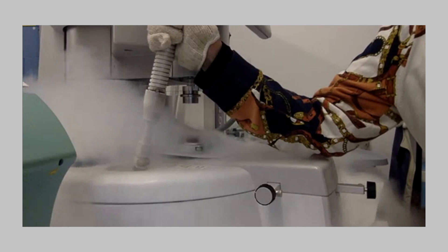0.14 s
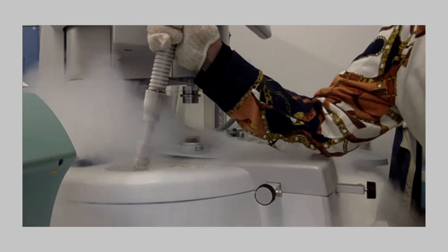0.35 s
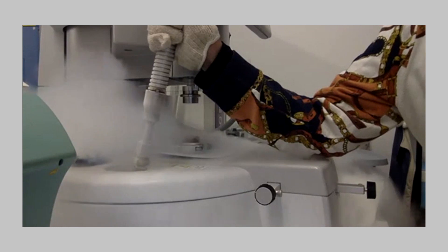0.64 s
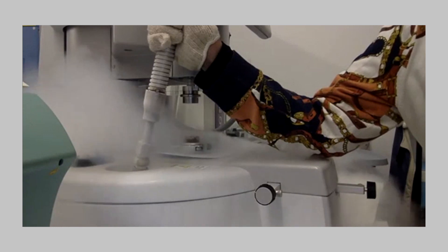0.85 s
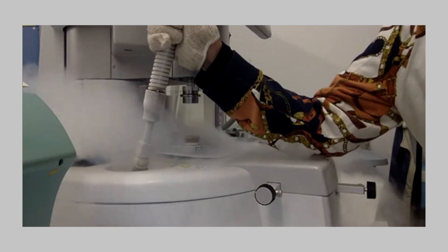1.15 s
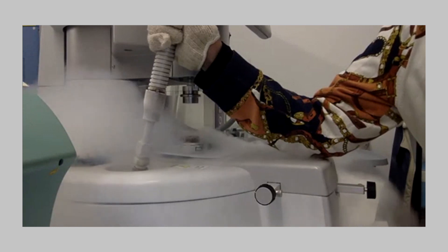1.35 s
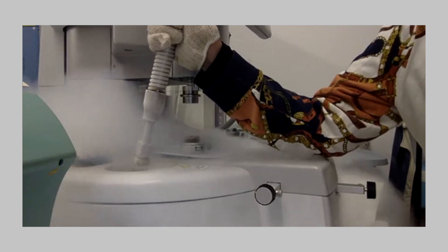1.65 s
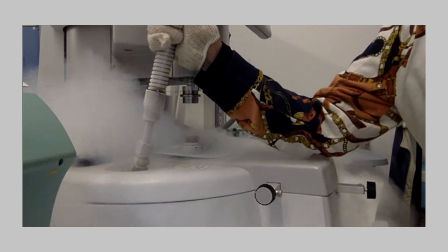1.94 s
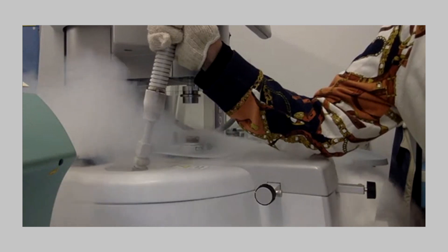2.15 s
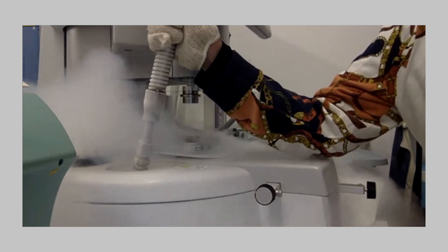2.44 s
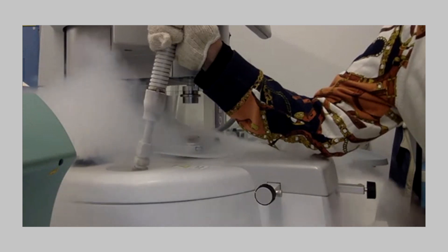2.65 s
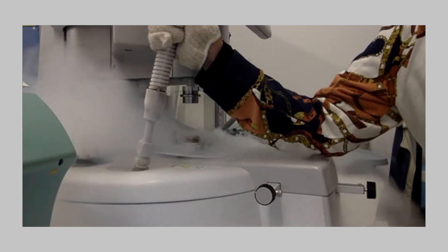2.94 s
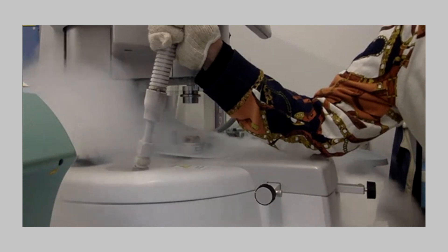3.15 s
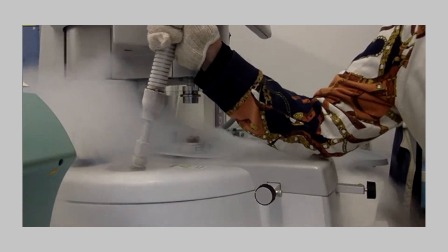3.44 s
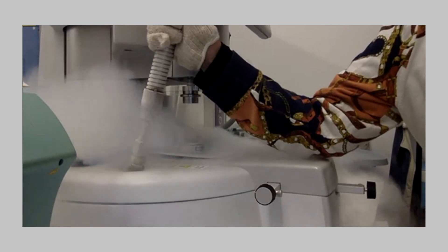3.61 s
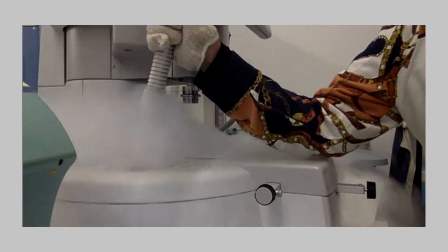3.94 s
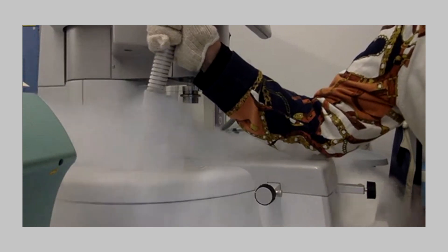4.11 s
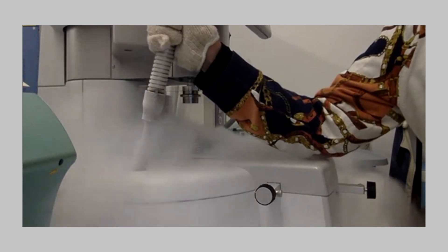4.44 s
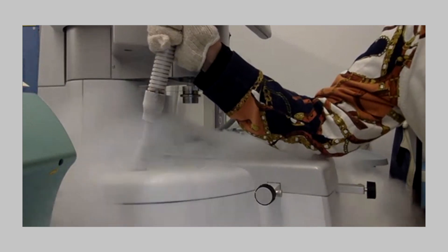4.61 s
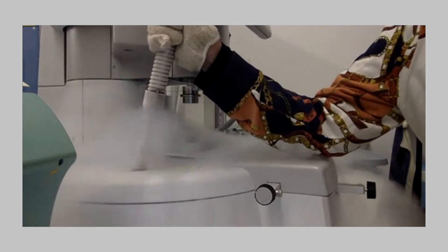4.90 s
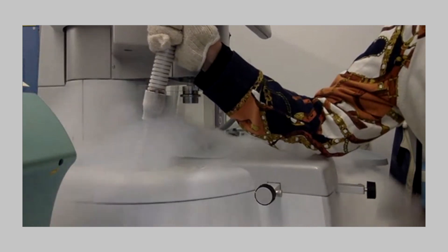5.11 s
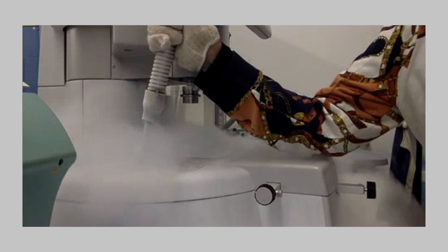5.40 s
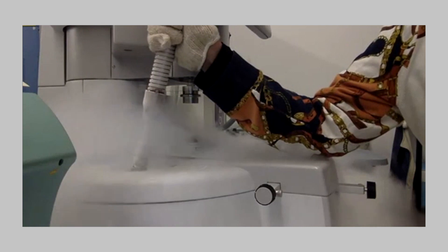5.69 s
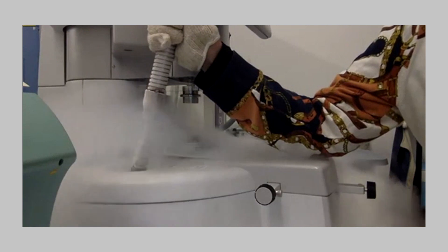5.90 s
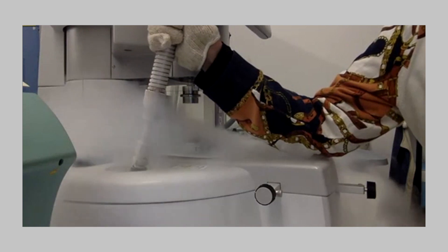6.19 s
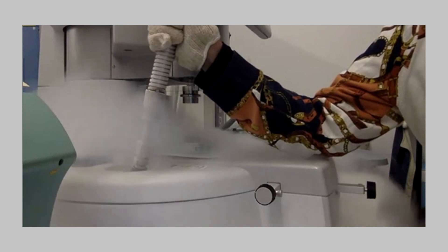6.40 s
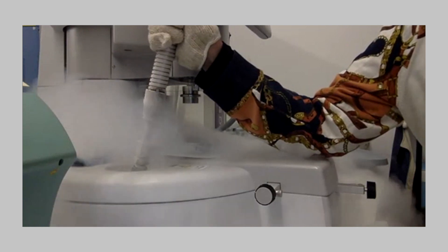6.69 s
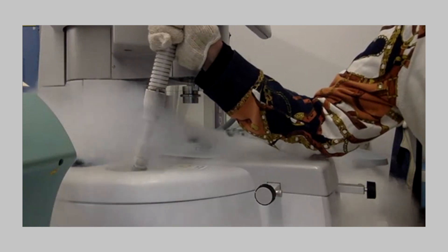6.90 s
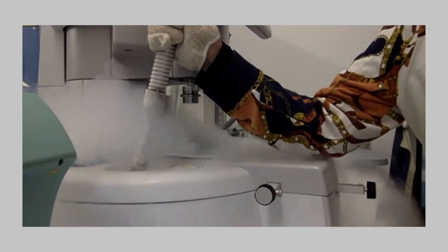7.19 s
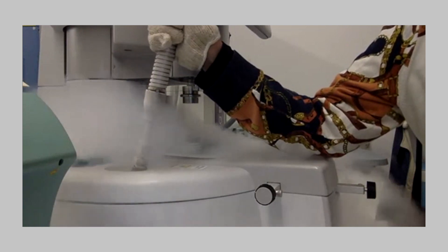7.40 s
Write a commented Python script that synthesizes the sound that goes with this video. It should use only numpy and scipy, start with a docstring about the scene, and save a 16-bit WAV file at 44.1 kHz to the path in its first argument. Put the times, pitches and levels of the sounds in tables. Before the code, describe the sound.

Close and mono, boiling liquid nitrogen sputters out of a nozzle with a bright, thin, fluttering hiss, crackling droplets and short chirpy rings. Airy high whistles swell now and then in the first half and again after five seconds. The busiest spitting comes past the middle, with quick dips in flow, before a softer ending. The tank's hollow bubbling is barely audible over faint room air, with hardly any echo.

```python
"""A ragged hiss full of tiny bursts comes first: liquid nitrogen sputters from a hose and boils off.
It rings a tank's narrow neck and the nozzle cavities, whose strengths shift as the hose moves.
Weakly, the tank's air column rings too. Now and then the flow chokes and snaps back.
Place: a ventilated lab. The jet and neck arrive direct, the fainter rest with a short room tail.
One microphone feeds both channels."""
import sys
import numpy as np
from scipy import signal
from scipy.fft import rfft, irfft, next_fast_len
from scipy.io import wavfile
from scipy.ndimage import uniform_filter1d, map_coordinates

SR = 44100
rng = np.random.default_rng(int(sys.argv[2]) if len(sys.argv) > 2 else 0)


def persist_wave(psi):
    """Save psi, clipped to +-1, as 16-bit WAV."""
    counts = np.round(np.clip(psi, -1, 1) * 32767).astype(np.int16)
    wavfile.write(sys.argv[1], SR, np.atleast_2d(counts).T)


def magnitude_from_level(level_db):
    """Linear magnitude for a level in decibels (20 dB per decade)."""
    exponent = np.asarray(level_db, float) / 20
    return 10 ** exponent


N = 332955

# ventilation of the lab, spectral shape: pitch_hz, relative_db
VENTILATION_SHAPE = [(13, -46), (22, -17.5), (32, -19), (80, -8), (258, 0.5), (324, -5), (450, -5),
                     (580, -24), (990, -120)]
# gas pockets bursting in the liquid: start_s, level_db (before the swell and fade), pitch_hz, swell_s
BUBBLES = [(4.4792, -56, 1266, 0.01), (7.0, -56, 1540, 0.0073)]
# boiling heard below the hiss, spectral shape: pitch_hz, relative_db
BOIL_SHAPE = [(200, -29.5), (400, -9), (1000, -7.5), (1800, -6), (2600, -3), (3200, -12.5), (4000, -41.5)]
# resonances of the tank's air column: pitch_hz, width_hz, level_db
TANK_MODES = [(647, 160, 0.5), (996, 72, 2), (1310, 140, -3.5)]
# the flow through the hose: time_s, hiss_level_db, boil_level_db, lowest_tank_mode_level_db
FLOW = [(0, -54, -75, -76.5), (.22, -46.5, -67, -76), (.5, -47, -64.5, -75), (.8, -48, -68, -74),
        (1.15, -48, -66.5, -74), (1.45, -50, -69.5, -77.5), (1.75, -48.5, -70, -72.5),
        (2.0, -50, -69.5, -75), (2.35, -47, -65, -74.5), (2.75, -48, -65.5, -75), (3.05, -47, -66.5, -73.5),
        (3.45, -48.5, -69, -75.5), (3.65, -47.5, -67, -72), (3.95, -45, -65.5, -74), (4.2, -49.5, -70, -74),
        (4.45, -47, -66, -72), (4.8, -48, -64.5, -72), (5.15, -52, -71.5, -76), (5.3, -46, -69, -72.5),
        (5.65, -46.5, -68, -73), (6.1, -49, -70, -75.5), (6.5, -49.5, -72, -75.5),
        (6.7, -47.5, -69.5, -73.5), (7.05, -48.5, -70.5, -75.5), (7.35, -52.5, -73.5, -76.5),
        (7.55, -52, -72.5, -76)]
# the flow chokes, then snaps back: return_s, length_s, depth_db
CHOKES = [(.094, 0.021, -0.5), (1.344, 0.079, -7), (3.385, 0.052, -4), (5.417, 0.059, -8),
          (6.443, 0.02, -2.5)]
# ring of the neck cavity: time_s, level_db, pitch_hz
NECK_RING = [(0, -48, 3776), (.2, -49, 3720), (.36, -54.5, 3698), (.45, -50, 3963), (.62, -49, 3948),
             (.78, -46, 3680), (1.0, -46.5, 3697), (1.3, -49, 3800), (1.75, -47, 3602), (2.05, -51.5, 3705),
             (2.55, -44, 3675), (3.0, -46, 3630), (3.6, -44.5, 3618), (3.75, -52, 3658), (4.1, -61.5, 3560),
             (4.35, -51, 3578), (4.5, -41.5, 3680), (4.7, -47.5, 3540), (5.2, -48.5, 3651),
             (5.5, -46.5, 3585), (5.85, -48.5, 3535), (6.05, -53.5, 3563), (6.22, -49, 3594),
             (6.4, -53, 3516), (6.6, -51.5, 3806), (6.85, -52, 3738), (7.05, -51, 3600), (7.3, -54.5, 3706),
             (7.55, -54, 3578)]
# spurts that ring a cavity for a moment:
# time_s, level_db (before the swell and fade), pitch_hz, length_s
SPURTS = [(0.0942, -37, 3650, 0.0091), (0.435, -32, 4010, 0.021), (0.934, -34, 3630, 0.0088),
          (2.122, -30.5, 3730, 0.017), (2.475, -29.5, 3676, 0.029), (2.5815, -34.5, 3655, 0.012),
          (2.6803, -28, 3400, 0.009), (2.8773, -25, 3530, 0.0093), (3.315, -31, 3650, 0.015),
          (3.3987, -36.5, 3200, 0.015), (3.458, -36, 3580, 0.022), (3.63, -33, 3820, 0.016),
          (3.754, -32, 3590, 0.0089), (4.13, -41, 3460, 0.009), (4.215, -36.5, 3540, 0.01),
          (4.3903, -26.5, 3613, 0.016), (4.415, -30, 3620, 0.013), (4.4792, -26.5, 3776, 0.021),
          (4.553, -28, 3680, 0.017), (4.576, -24, 3604, 0.012), (4.593, -29, 3600, 0.011),
          (4.85, -27.5, 3555, 0.012), (4.9208, -26.5, 3570, 0.014), (5.0, -35, 3540, 0.012),
          (5.014, -28, 3490, 0.0082), (5.074, -32.5, 3760, 0.025), (5.269, -33.5, 3810, 0.016),
          (5.3084, -20, 3555, 0.011), (5.3436, -25, 3560, 0.014), (5.5075, -28.5, 3460, 0.009),
          (5.539, -30, 3610, 0.0092), (5.6171, -33, 3490, 0.013), (5.7814, -34, 3530, 0.015),
          (2.0994, -38.5, 4420, 0.032), (2.8045, -35, 4970, 0.02), (4.4069, -35, 5220, 0.021),
          (4.5296, -31, 4930, 0.017), (5.8342, -37.5, 4460, 0.028)]
# nozzle cavities: time_s, low_over_hiss_db, middle_over_hiss_db, middle_pitch_hz
NOZZLE = [(0, -7.5, -0.5, 4600), (.3, -7.5, -6.5, 4704), (.75, -11.5, -5, 4610), (1.05, -7, -5, 4600),
          (1.22, -8, -4, 4700), (1.4, -9, -8.5, 4675), (2.0, -10, -5.5, 4580), (2.45, -8, -4.5, 4514),
          (2.85, -11, -1, 4843), (3.05, -15.5, -2, 4708), (3.45, -6, -10, 4815), (4.0, -9.5, -3.5, 4970),
          (4.25, -14, -15, 4790), (4.36, -12.5, -0.5, 5100), (4.5, -5.5, 2, 4833), (4.66, -9, 0.5, 4525),
          (4.74, -10, -11, 4570), (5.15, -10.5, -4.5, 4620), (5.45, -6.5, -2.5, 4613),
          (5.7, -12, -14, 4554), (5.9, -12, -6.5, 4480), (6.4, -8.5, -5.5, 4720), (6.75, -10, -5, 4500),
          (7.1, -11.5, -10, 4700), (7.55, -8, -6, 4620)]
# the high nozzle cavity whistles up: peak_s, swell_db, pitch_hz, half_length_s
WHISTLES = [(.52, 14.5, 7263, .04), (.88, 8, 7020, .06), (1.04, 6, 6920, .1), (1.7, 9.5, 6910, .1),
            (3.1, 7, 6970, .1), (3.6, 11, 6980, .1), (3.91, 17, 6960, .075), (4.391, 8.5, 6900, .05),
            (5.284, 9, 7150, .08), (5.44, 5, 6760, .03), (5.6, 10.5, 6980, .07)]
# broad hiss at the microphone, spectral shape: pitch_hz, relative_db
HISS_SHAPE = [(1180, -60.5), (2000, -31), (2650, -28.5), (3160, -5.5), (3650, -2), (4160, -4.5),
              (4700, -6.5), (5940, -10.5), (6880, -11), (7210, -15), (7460, -23), (7640, -26.5),
              (8100, -44), (10500, -81), (17800, -120)]


def unit(x):
    """Scales to rms 1."""
    return x / np.sqrt(np.mean(x ** 2) + 1e-20)


def curves(rows):
    """One value per sample for each column after the time."""
    time_s, *columns = np.transpose(rows)
    return [np.interp(np.arange(N) / SR, time_s, column) for column in columns]


def wobble(rate):
    """A smooth random curve, rate knots a second."""
    knots = rng.standard_normal(int(N * rate / SR) + 4)
    return map_coordinates(knots, [np.arange(N) * rate / SR])


def drift(slow_db, fast_db):
    """A layer's own unsteadiness in dB."""
    return slow_db * wobble(3.3) + fast_db * wobble(14)


def filtered(x, response):
    """x times a response of frequency."""
    size = next_fast_len(N + 8192)
    return irfft(rfft(x, size) * response(np.fft.rfftfreq(size, 1 / SR)), size)[:N]


def colour(points):
    """Gain through (Hz, dB) points on a log frequency axis."""
    point_hz, db = np.transpose(points)
    return lambda hz: magnitude_from_level(np.interp(np.log(hz + 1), np.log(point_hz + 1), db))


def turbulence(ragged_db, patchy_db):
    """Noise that flutters at sputter speed, with patches of random gain over time and pitch."""
    spectrum = signal.stft(rng.standard_normal(N), nperseg=512)[2]
    patches = uniform_filter1d(rng.standard_normal(spectrum.shape), size=5, axis=0)  # over pitch
    patches = uniform_filter1d(patches, size=10, axis=1)  # over time
    noise = signal.istft(spectrum * magnitude_from_level(patchy_db * unit(patches)), nperseg=512)[1][:N]
    return unit(noise * magnitude_from_level(ragged_db * wobble(250)))


def cavity(pitch_hz, width_hz, flutter_db):
    """Turbulence ringing in a cavity of moving pitch: narrow noise carried on that pitch."""
    phase = 2 * np.pi * np.cumsum(pitch_hz) / SR

    def resonance(hz):
        """Resonant skirt about the carrier, steeper far out."""
        return 1 / (1 + (2 * hz / width_hz) ** 2) / (1 + (hz / (3.1 * width_hz)) ** 4)

    in_phase, quadrature = (filtered(rng.standard_normal(N), resonance) for _ in range(2))
    ring = in_phase * np.cos(phase) + quadrature * np.sin(phase)
    return unit(ring * magnitude_from_level(flutter_db * wobble(40)))


def ventilation():
    """Steady low air noise, random and shaped by frequency."""
    return magnitude_from_level(-81.5) * unit(filtered(rng.standard_normal(N), colour(VENTILATION_SHAPE)))


def lab(x):
    """The room answers faintly: a noise tail that fades 60 dB in 0.08 s."""
    t = np.arange(SR // 2) / SR
    tail = rng.standard_normal(len(t)) * magnitude_from_level(-60 * t / 0.08)
    answer = signal.fftconvolve(x, tail / np.linalg.norm(tail))[:N]
    return x + magnitude_from_level(-18) * answer


def bubbles():
    """Each burst pocket rings briefly at its own pitch."""
    t = np.arange(SR // 10) / SR
    out = np.zeros(N + len(t))
    for start_s, level_db, pitch_hz, swell_s in BUBBLES:
        u = t / swell_s
        ring = u * np.exp(-u) * np.sin(2 * np.pi * pitch_hz * t)
        out[round(start_s * SR):][:len(t)] += magnitude_from_level(level_db) * ring
    return out[:N]


def air_column(hz):
    """Response of the tank's air column: resonances added to a direct path."""
    response = 0.69
    for pitch, width, level_db in TANK_MODES:
        damping = 1j * hz * width
        response = response + magnitude_from_level(level_db) * damping / (pitch * pitch - hz * hz + damping)
    return response


def tank(sputter):
    """Boiling rings the tank's air column at near-harmonic pitches; the lowest mode swells on its own."""
    boil = filtered(turbulence(ragged_db=1.0, patchy_db=1.5),
                    lambda hz: colour(BOIL_SHAPE)(hz) * air_column(hz))
    lowest = filtered(boil, colour([(800, -0.5), (900, -40.5)]))
    _, boil_db, lowest_db = curves(FLOW)
    lowest_db = lowest_db + drift(slow_db=0.14, fast_db=1.0)
    upper_db = boil_db + drift(slow_db=1.0, fast_db=0.98)
    modes = magnitude_from_level(lowest_db) * unit(lowest) + magnitude_from_level(upper_db) * unit(boil - lowest)
    return magnitude_from_level(0.35 * sputter) * modes


def choke():
    """Gain that sags while the flow starves and jumps back at once."""
    t, db = np.arange(N) / SR, np.zeros(N)
    for return_s, length_s, depth_db in CHOKES:
        sag = np.clip(2 * (1 + (t - return_s) / length_s), 0, 1)  # full depth halfway through
        db += depth_db * sag * (t < return_s)
    return magnitude_from_level(db)


def spurts(ring_db):
    """Large and small spurts each ring a cavity as a short tone; ring_db is the neck's level curve."""
    count, loudest_db, spread_db = 500, 13, 9.5  # small spurts, levels over the neck's ring
    low_hz, high_hz, small_length_s = 3253, 4500, .0045
    when, pitch, size = rng.random((count, 3)).T
    when_s = .01 + when * (N / SR - .02)
    small_db = ring_db[(when_s * SR).astype(int)] + loudest_db - spread_db * size
    small_hz = low_hz + pitch ** 2 * (high_hz - low_hz)  # mostly near the low end
    small = zip(when_s, small_db, small_hz, np.full(count, small_length_s))
    out = np.zeros(N + SR)
    phases = rng.uniform(0, 2 * np.pi, len(SPURTS) + count)
    for (time_s, level_db, pitch_hz, length_s), phase in zip([*SPURTS, *small], phases):
        t = np.arange(round(3 * length_s * SR)) / SR
        u = 5 * t / length_s
        swell = u * u * np.exp(-u)  # a soft swell, then a quick fade
        start = round((time_s - .003) * SR)  # the swell begins just ahead of the listed time
        out[start:][:len(t)] += magnitude_from_level(level_db) * swell * np.sin(2 * np.pi * pitch_hz * t + phase)
    return out[:N]


def neck(sputter):
    """The neck cavity rings all along and sings out at each spurt, large or small."""
    level_db, pitch_hz = curves(NECK_RING)
    wander_hz = pitch_hz + 60 * wobble(12)
    ring_db = level_db + drift(slow_db=0.27, fast_db=1.5) + 0.79 * sputter
    ring = magnitude_from_level(ring_db) * cavity(wander_hz, width_hz=360, flutter_db=-0.07)
    return ring + spurts(level_db)


def whistle():
    """Swell in dB and pitch in Hz of the high cavity: a bell-shaped rise at each whistle."""
    rest_hz = 6830
    peak_s, swell_db, pitch_hz, half_length_s = np.transpose(WHISTLES)[:, :, None]
    bell = np.exp(-((np.arange(N) / SR - peak_s) / half_length_s) ** 2)
    return (swell_db * bell).sum(0), rest_hz + ((pitch_hz - rest_hz) * bell).sum(0)


def nozzle():
    """Three cavities around the nozzle ring with the jet, at levels relative to its hiss."""
    low_db, middle_db, middle_hz = curves(NOZZLE)
    swell_db, high_hz = whistle()
    low_db = low_db + drift(slow_db=1.5, fast_db=1.5)
    middle_db = middle_db + drift(slow_db=0.2, fast_db=1.0)
    high_db = -15.5 + swell_db + drift(slow_db=1.2, fast_db=2.0)
    low = magnitude_from_level(low_db) * cavity(np.full(N, 3155.0), width_hz=440, flutter_db=3.0)
    middle = magnitude_from_level(middle_db) * cavity(middle_hz + 70 * wobble(6), width_hz=760, flutter_db=3.5)
    high = magnitude_from_level(high_db) * cavity(high_hz, width_hz=420, flutter_db=3.0)
    return low + middle + high


def spits():
    """Droplets flash to gas: sharp ticks of either sign with the colour of the hiss."""
    count, over_hiss_db, spread_db = 1600, -5.5, 5.5
    when, size = rng.random((count, 2)).T
    strength = np.sign(size - .5) * magnitude_from_level(4 * spread_db * abs(size - .5))
    ticks = np.bincount((when * N).astype(int), strength, N)
    return magnitude_from_level(over_hiss_db) * unit(filtered(ticks, colour(HISS_SHAPE)))


def jet(sputter):
    """Broad hiss of the boiling jet, its spits and the nozzle cavities, all driven by the flow."""
    flow_db = curves(FLOW)[0]
    noise = filtered(turbulence(ragged_db=2.0, patchy_db=3.0), colour(HISS_SHAPE))
    hiss = magnitude_from_level(drift(slow_db=0.53, fast_db=0.08)) * unit(noise)
    return (hiss + spits() + nozzle()) * magnitude_from_level(flow_db + 0.26 * sputter)


def scene():
    """The jet's layers share its sputter and chokes over steady ventilation, on one microphone."""
    sputter = unit(wobble(12) + 1.8 * wobble(60))
    flow = choke()
    direct = flow * (jet(sputter) + neck(sputter))
    boiling = flow ** 1.17 * tank(sputter)  # the tank sinks 1.17 times as deep in dB
    mono = direct + lab(boiling + bubbles() + ventilation())
    return np.array([mono, mono])


def band_limit(x):
    """A steep low-pass at the top of the band."""
    return signal.sosfilt(signal.butter(12, 8610, fs=SR, output="sos"), x)


def record(dry):
    """The recorder cuts the deep bass and rolls the treble off steeply."""
    edge = colour([(20, -9.5), (60, 0.0), (7300, -1), (7700, -6.5), (8080, -21.5), (8200, -81.5)])
    mix = np.array([filtered(channel, edge) for channel in dry])
    return band_limit(mix)


dry = scene()
out = record(dry)
persist_wave(out)
```